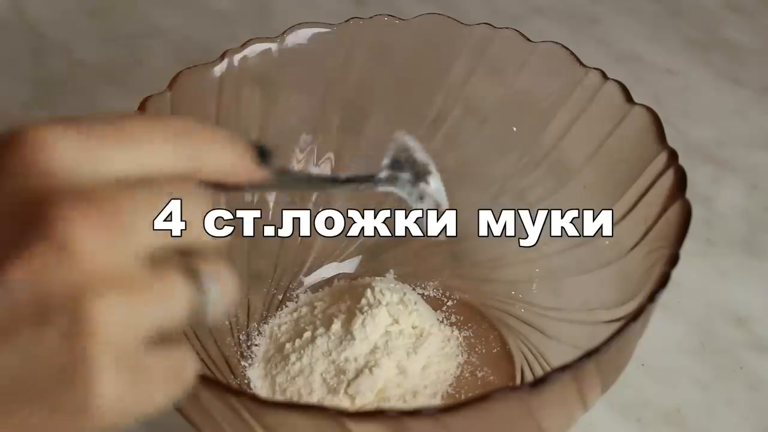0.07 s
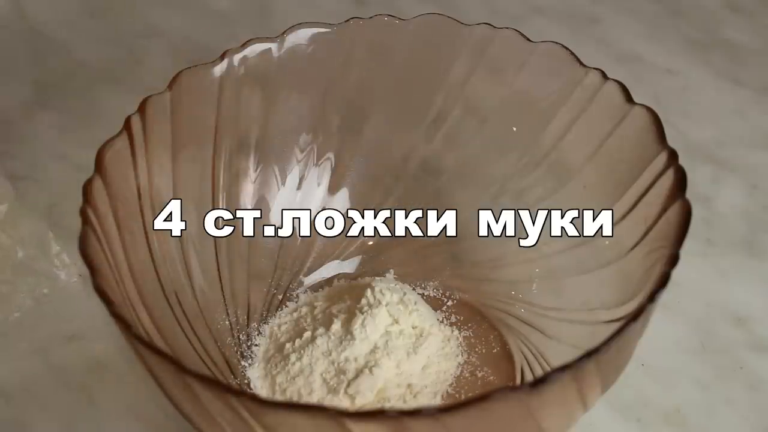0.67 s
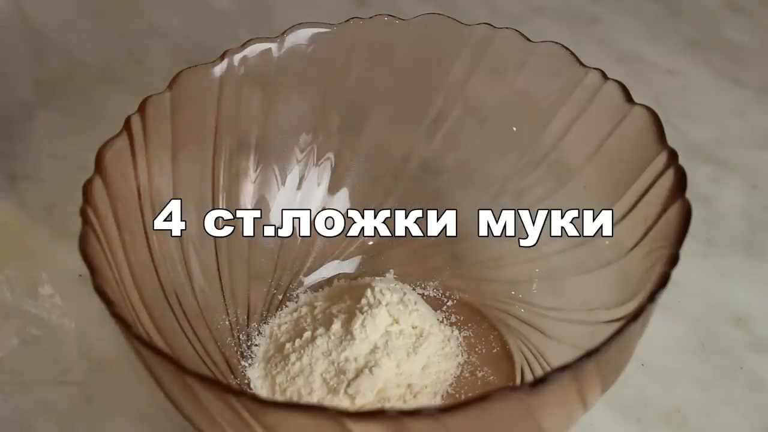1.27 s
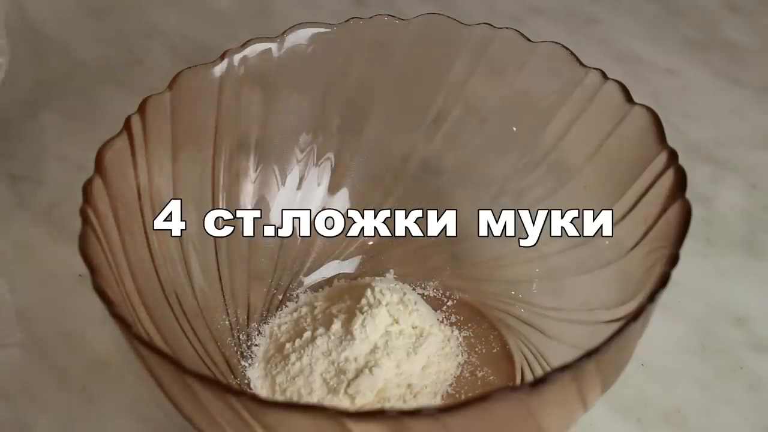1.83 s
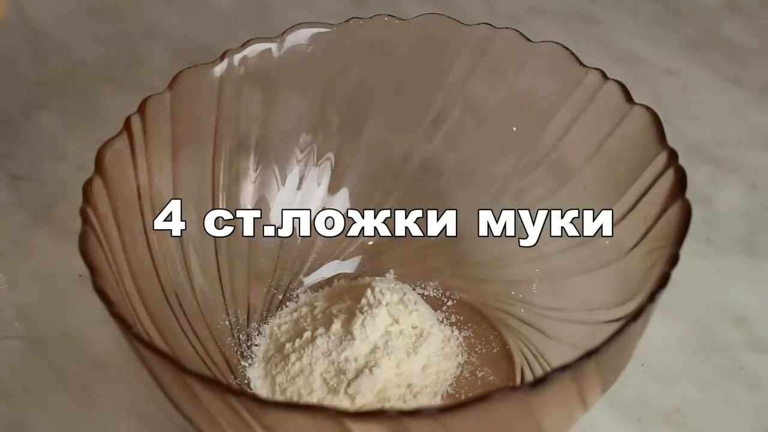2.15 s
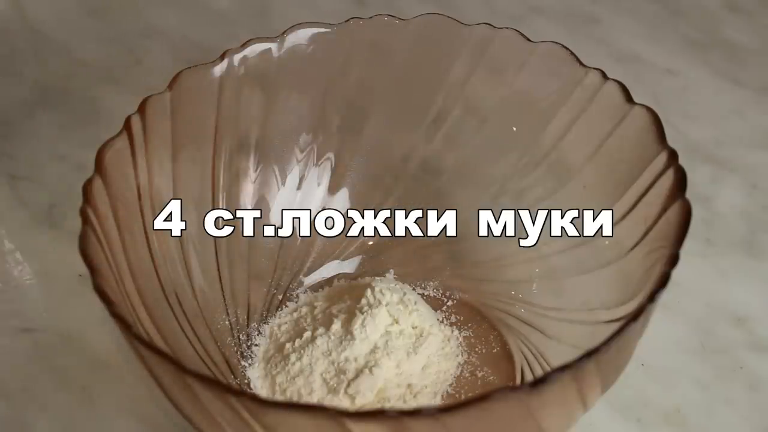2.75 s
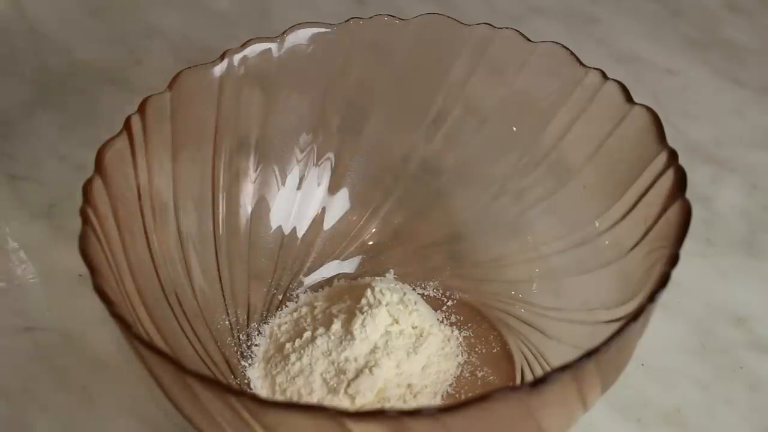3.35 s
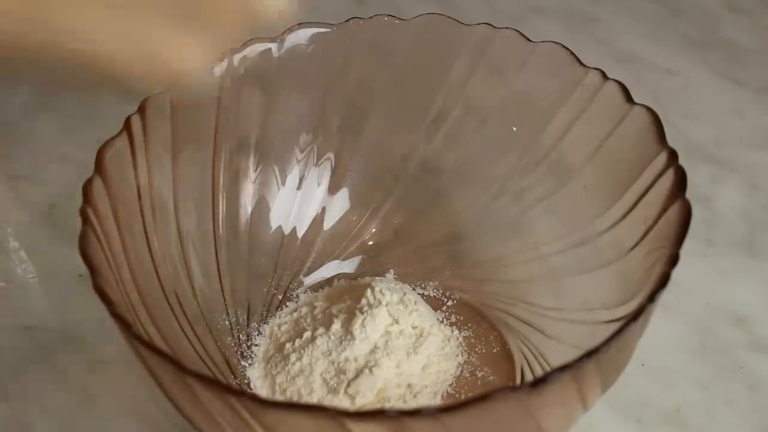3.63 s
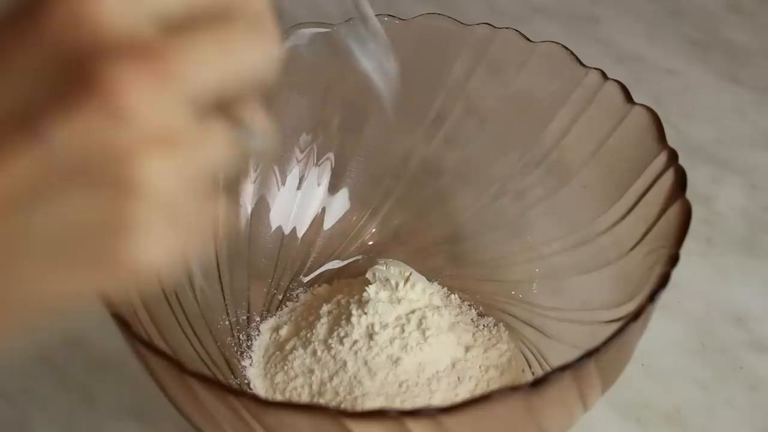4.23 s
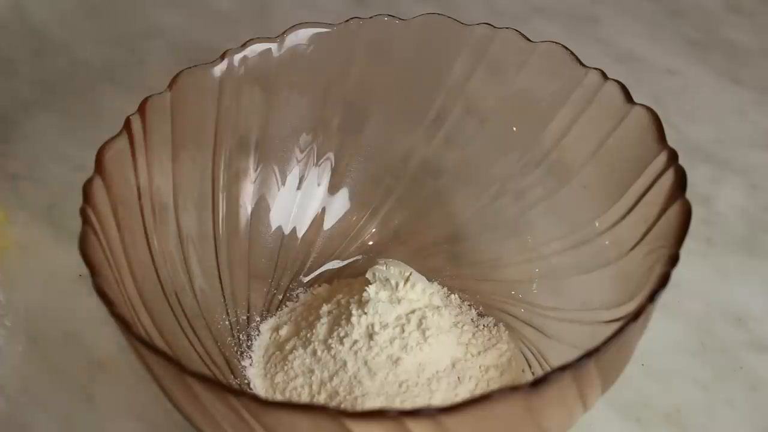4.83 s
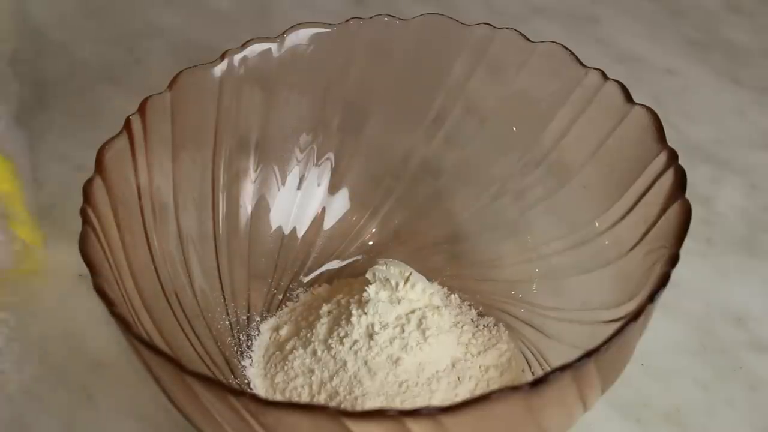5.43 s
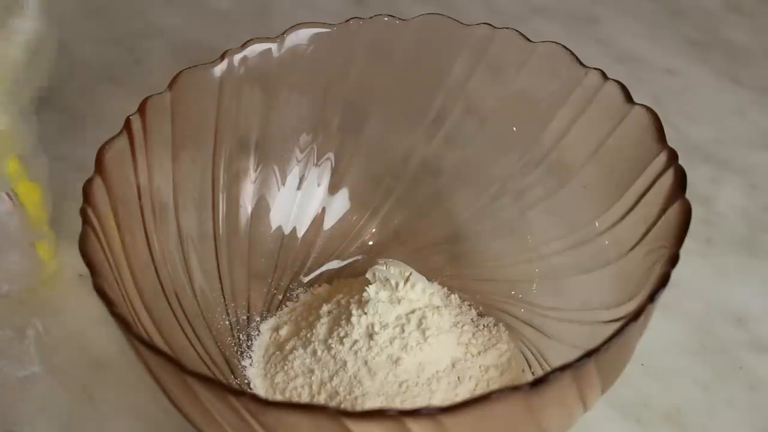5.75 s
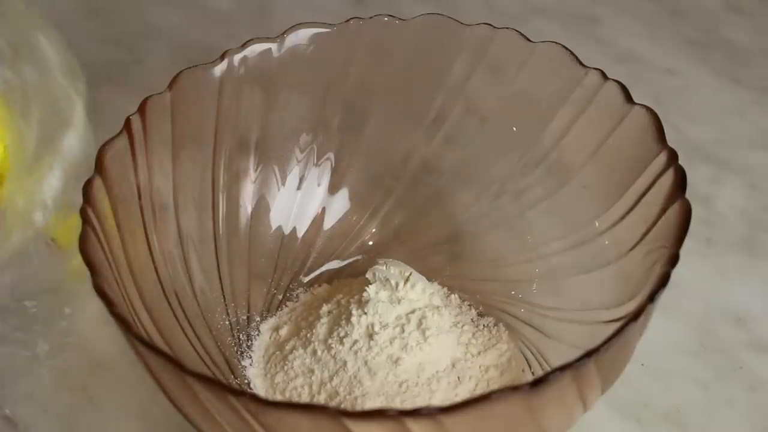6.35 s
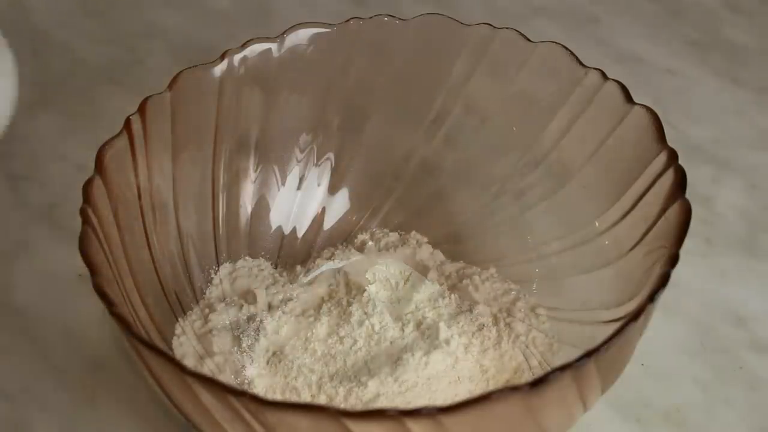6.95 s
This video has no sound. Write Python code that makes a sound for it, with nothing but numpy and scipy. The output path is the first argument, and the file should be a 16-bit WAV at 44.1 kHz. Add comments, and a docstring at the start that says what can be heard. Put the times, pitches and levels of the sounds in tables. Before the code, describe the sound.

A metal spoon rattles faintly, then clacks sharply at about 0.4 seconds. From 0.6 to 2.8 seconds it digs flour out of a thin plastic bag, which crinkles unevenly, with crisp snaps and soft hollow bumps against the counter. A dull knock on the counter comes near 2.4 seconds. The bag then settles with tiny, faint ticks. Just before 4 seconds the spoon clicks once and flour lands in a glass bowl with a barely audible puff. From about 4.5 seconds the bag is gathered up in a long, bright, crackling rustle that grows louder after 5 seconds and lasts until the end, around 7 seconds. Within it come sharp snaps, a thump near 5.5, a short low drag and a slight puff of air on the microphone near 6.2. Everything sounds close, in a small kitchen with short echoes and a faint hum.

```python
"""A spoon rattles lightly and clacks, then digs flour out of a plastic bag on a kitchen counter.
The bag crumples as creases give way, snaps as panels buckle, and bumps; something knocks on the counter.
The spoon clicks and flour drops softly into a glass bowl. Then the thin plastic is gathered up
with a long bright rustle. A small hard room answers, over a faint hum."""
import sys
import numpy as np
from scipy import signal
from scipy.fft import rfft, irfft
from scipy.io import wavfile

SR = 44100
rng = np.random.default_rng(int(sys.argv[2]) if len(sys.argv) > 2 else 0)


def bounce(signal):
    """Save signal as a 16-bit WAV file at the path given by the first command-line argument."""
    frames = np.transpose(np.atleast_2d(signal))
    limited = np.clip(frames, -1, 1)
    pcm = np.round(limited * 32767).astype(np.int16)
    wavfile.write(sys.argv[1], SR, pcm)


N = 307818
TIME = np.arange(N) / SR


def gain_of(db):
    """Decibels to amplitude."""
    return 10 ** (np.asarray(db) / 20)


def unit_rms(x):
    return x / np.sqrt(np.mean(x ** 2) + 1e-20)


def unit_energy(x):
    return x / np.sqrt(np.sum(x ** 2) + 1e-20)


def value_at(points, hz):
    """Interpolates on a log-frequency axis."""
    points_hz, values = np.transpose(points)
    return np.interp(np.log(hz + 1), np.log(points_hz + 1), values)


def add(mix, at_s, sound):
    part = mix[max(round(at_s * SR), 0):][:len(sound)]
    part += sound[:len(part)]


def colour(x, spectrum, size=2048):
    """Minimum-phase filter: attacks stay sharp."""
    gain = gain_of(value_at(spectrum, np.fft.rfftfreq(size, 1 / SR)))
    cepstrum = irfft(np.log(gain))
    cepstrum[1:size // 2] *= 2
    cepstrum[size // 2 + 1:] = 0
    return signal.oaconvolve(x, irfft(np.exp(rfft(cepstrum))))[:len(x)]


def ring(x, hz, width_hz):
    """One damped mode."""
    r = np.exp(-np.pi * width_hz / SR)
    return signal.lfilter([1, 0, -1], [1, -2 * r * np.cos(2 * np.pi * hz / SR), r * r], x)


def swell(at_s, width_s):
    """Gaussian envelope."""
    return np.exp(-((TIME - at_s) / width_s) ** 2)


def drift(rate_hz, size=8192):
    """Smooth random curve of rms 1, rolled off above the rate."""
    step_s = TIME[-1] / (size - 1)
    lowpass = np.exp(-(np.fft.rfftfreq(size, step_s) / rate_hz) ** 2)
    curve = irfft(rfft(rng.standard_normal(size)) * lowpass)
    return np.interp(TIME, np.arange(size) * step_s, unit_rms(curve))


def grains(per_s, spread_db, clump_db, clump_hz):
    """Uneven clicks in clumps, as creases give way; the rare ones are loud."""
    chance = rng.random(N) * SR / per_s
    at = np.flatnonzero(chance < 1)
    rarity = np.minimum(-np.log(chance[at]), 4)
    clicks = np.zeros(N)
    clicks[at] = (-1.) ** at * gain_of(spread_db * rarity + clump_db * drift(clump_hz)[at])
    return clicks


def crackle(spectrum, per_s, spread_db, clump_db, clump_hz):
    """Filtered grains of rms 1."""
    return unit_rms(colour(grains(per_s, spread_db, clump_db, clump_hz), spectrum))


def burst(length_s, rise_share=0.33, size=4096):
    """A run of tiny slips: fast rise, exponential decay, flat spectrum."""
    age = np.arange(size) / SR / length_s
    slips = rng.standard_normal(size) * np.exp(-age) * (1 - np.exp(-age / rise_share))
    flat = irfft(np.exp(1j * np.angle(rfft(slips))))
    return flat * np.exp(-(np.arange(size) / (size / 2)) ** 4)


def impact(spectrum, length_s):
    """Filtered burst of energy 1."""
    return unit_energy(colour(burst(length_s), spectrum))


# room noise spectrum: (frequency [Hz], level [dB])
ROOM_NOISE = [(15, -31), (25, -4.5), (102, -10), (170, -8.5), (205, -10.5), (228, -9), (316, -12),
              (361, -15), (527, -15), (1280, -22.5), (1870, -22), (2390, -23.5), (2730, -24), (3580, -24.5),
              (15800, -26)]
# mains hum: (frequency [Hz], level [dB])
MAINS_HUM = [(101, -69), (202, -66.5)]


def background(noise_db=-54.5, waver_rad=0.46):
    """Steady room noise and a faint wavering mains hum."""
    hum = np.zeros(N)
    for hz, db in MAINS_HUM:
        phase = 2 * np.pi * hz * TIME + waver_rad * drift(rate_hz=2.7)
        hum += gain_of(db) * unit_rms(np.sin(phase))
    return gain_of(noise_db) * unit_rms(colour(rng.standard_normal(N), ROOM_NOISE)) + hum


# spectra of shifting flour and crumpling folds: (frequency [Hz], level [dB])
FLOUR_SHIFT = [(30, -25), (90, -10), (180, -3.5), (250, -3.5), (325, 0.5), (450, -3.5), (590, -2),
               (900, -9), (1500, -7.5), (4000, -54)]
FOLD_CRUMPLE = [(300, -25), (700, -8), (1000, -12.5), (1600, 6), (2700, 2), (4000, -1), (6000, -4),
                (9000, -2), (15000, -71)]


def held_bag(level_db=-58, creak_db=-3):
    """The held bag shifts and creaks faintly before the spoon arrives."""
    shift = crackle(FLOUR_SHIFT, per_s=500, spread_db=1, clump_db=3.3, clump_hz=30)
    creak = crackle(FOLD_CRUMPLE, per_s=900, spread_db=2, clump_db=2, clump_hz=30)
    return gain_of(level_db) * (shift + gain_of(creak_db) * creak) * swell(at_s=0.22, width_s=0.58)


# hard contact spectrum: (frequency [Hz], level [dB])
CONTACT_CLICK = [(200, -4), (1000, -1), (3000, 3.5), (6000, -7), (9000, 6.5), (12000, -3), (16000, -45)]


def strike(blows, modes, contact_db, cutoff_hz, contact_s=0.00057):
    """Blows excite damped modes; returns the direct sound and one merged blow as the room send."""
    grid_hz = np.geomspace(30, 20000, 400)
    power = gain_of(contact_db + value_at(CONTACT_CLICK, grid_hz)) ** 2
    for hz, width_hz, db in modes:
        detuning = (grid_hz ** 2 - hz ** 2) / (grid_hz * width_hz)
        power += gain_of(db) ** 2 / (1 + detuning ** 2)
    power /= 1 + (grid_hz / cutoff_hz) ** 4  # softer contact, less treble
    spectrum = np.transpose([grid_hz, 10 * np.log10(power)])
    direct, send = np.zeros((2, N))
    for at_s, db in blows:
        add(direct, at_s, gain_of(db) * impact(spectrum, contact_s))
    strength = np.linalg.norm([gain_of(db) for _, db in blows])
    add(send, blows[0][0], strength * impact(spectrum, contact_s))
    return direct, send


# spoon modes: (frequency [Hz], width [Hz], level [dB])
SPOON_MODES = [(340, 58, -2), (1460, 200, 3), (1770, 95, 5), (2730, 280, -3), (3490, 270, 1),
               (4600, 1200, -6), (7300, 820, -2), (9000, 600, -3)]
# light touches: (time [s], relative energy [dB])
SPOON_TAPS = [(0.024, -46.5), (0.0737, -41), (0.1153, -39), (0.1333, -41), (0.179, -47), (0.1952, -36),
              (0.2274, -32.5), (0.2447, -38), (0.275, -36.5)]


def spoon_rattle(level_db=15, width_ratio=0.48):
    """Light touches leave the spoon's modes freer to ring than a hard clack does."""
    modes = [(hz, width_hz * width_ratio, db) for hz, width_hz, db in SPOON_MODES]
    direct, _ = strike(SPOON_TAPS, modes, contact_db=-10.5, cutoff_hz=6200, contact_s=0.0021)
    return gain_of(level_db) * direct


# buckling panels: (time [s], relative energy [dB], pitch [Hz], ringing share [0-1], length [s])
BUCKLES = [(0.334, -24, 1450, .9, 0.0035), (0.349, -15, 1480, 0.82, 0.0062), (0.805, -17, 1610, 0.7, .004),
           (0.839, -1.5, 1580, 0.09, 0.0041), (0.929, -6.5, 1550, 0.4, 0.0052),
           (0.958, -3.5, 1460, .85, 0.002), (0.972, -3.5, 2450, 0.5, 0.0027),
           (1.001, -7.5, 2300, 0.56, .005), (1.037, -2, 1995, 0.4, .0035), (1.084, -1, 940, 0.32, 0.0045),
           (1.395, -12.5, 1790, 0.64, 0.0025), (1.443, -9, 1750, 0.55, 0.0042),
           (1.473, -4.5, 940, 0.33, 0.013), (1.495, -4, 1620, 0.98, 0.0033), (1.876, -3, 2300, 0.64, .004),
           (1.892, -6.5, 1710, 1, 0.0033), (1.94, -10.5, 1080, 0.8, 0.0063), (2.201, -12.5, 1440, .9, .004),
           (2.256, 0.5, 2220, 0.28, .003), (4.587, -22, 1580, 0.9, 0.0035), (4.599, -12.5, 1390, 1, 0.0031),
           (4.772, -11.5, 1070, 0.4, 0.0042), (5.064, -18.5, 1460, .5, 0.0034),
           (5.169, -3, 1770, 0.8, 0.0095), (5.224, -6, 1560, 0.7, 0.0083), (5.243, -1.5, 2470, 0.5, 0.01),
           (5.466, -9, 1800, .1, 0.004), (5.826, -9, 1880, 0.64, .003), (5.904, 2, 2830, 0.27, .003),
           (6.167, -4, 950, 1, .003)]
# spectra of a snap's parts: (frequency [Hz], level [dB])
SNAP_CRACK = [(2000, -39), (4500, -7), (8000, 13.5), (10500, 10), (12500, 8), (15500, -14)]
SNAP_BODY = [(40, -23), (150, -1.5), (300, 0), (700, 1.5), (1300, 4), (2400, 2.5), (3800, 2.5),
             (5500, -6.5), (9000, -11.5), (15000, -42)]
SNAP_THUD = [(50, -29), (150, -3), (250, 0.5), (325, -2.5), (450, -3.5), (580, -8.5), (800, -4),
             (2000, -71)]


def bag_snaps(level_db=1.34, crack_db=-6, thud_db=-15, panel_q=9.1):
    """A panel buckles: it cracks, rings and thuds against the flour; a clean ring cracks less."""
    out = np.zeros(N)
    for at_s, db, hz, ring_share, length_s in BUCKLES:
        # harder snaps put a smaller share into crack and thud
        crack = gain_of(crack_db - 0.25 * db) * impact(SNAP_CRACK, length_s)
        body = impact(SNAP_BODY, length_s)
        panel = unit_energy(ring(burst(length_s), hz, hz / panel_q))
        thud = gain_of(thud_db - 0.55 * db) * impact(SNAP_THUD, length_s)
        snap = np.sqrt(1 - ring_share) * (body + crack) + np.sqrt(ring_share) * panel + thud
        add(out, at_s, gain_of(level_db + db) * snap)
    return out


# hard blows: (time [s], energy [dB])
SPOON_BLOWS = [(.4106, 6.5), (.4113, 4.5), (.4127, 3.5), (.415, -4)]


def spoon_clack():
    """The spoon chatters against something hard; returns direct sound and room send."""
    return strike(SPOON_BLOWS, SPOON_MODES, contact_db=-10.5, cutoff_hz=15000)


# bag movements: (time [s], film level [dB], fold level [dB])
SPOON_IN = [(0.58, -48.5, -64), (0.788, -48, -45.5), (0.85, -31, -36.5), (0.93, -44, -44),
            (0.99, -39.5, -47), (1.048, -48, -36.5), (1.178, -41, -35.5), (1.27, -47, -46)]
SPOON_OUT = [(1.27, -42, -46.5), (1.452, -44.5, -44), (1.746, -40.5, -50), (1.864, -37.5, -39),
             (2.078, -43, -44.5), (2.36, -51, -45), (2.636, -48.5, -57.5), (2.794, -59, -57),
             (2.95, -74, -74)]
HAND_GRIP = [(4.4, -65, -68), (4.442, -60.5, -75), (4.644, -40.5, -45.5), (4.756, -46, -50.5),
             (4.866, -34.5, -37), (5.012, -55, -55), (5.12, -52, -55)]
HAND_GATHER = [(5.12, -52, -54), (5.254, -32.5, -33), (5.322, -39.5, -46.5), (5.502, -31.5, -40.5),
               (5.528, -36.5, -38.5), (5.7, -29.5, -39), (5.968, -30, -35.5), (6.004, -33, -47),
               (6.14, -26, -34), (6.352, -36.5, -47.5), (6.362, -30.5, -40), (6.776, -37, -47.5),
               (6.814, -33, -44.5), (6.906, -39, -50.5), (6.922, -31, -50), (6.98, -41.5, -52)]


def handling(fade_db_per_s=35):
    """Film and fold envelopes for scooping and gathering, faded at both ends."""
    out = np.zeros((2, N))
    for bout in (np.vstack([SPOON_IN, SPOON_OUT]), np.vstack([HAND_GRIP, HAND_GATHER])):
        times_s, *curves_db = bout.T
        fade_db = fade_db_per_s * abs(TIME - np.clip(TIME, times_s[0], times_s[-1]))
        out += [gain_of(np.interp(TIME, times_s, db) - fade_db) for db in curves_db]
    return out


# sliding flaps: (time [s], rise [s], peak level [dB])
FLAP_SLIDES = [(0.645, 0.019, -49.5), (2.075, 0.037, -37), (2.2, 0.031, -38.5), (2.62, 0.06, -42.5),
               (4.48, 0.045, -63), (5.34, 0.029, -39), (5.68, 0.035, -32)]


def flap_swishes(sharpness=2.2):
    """Envelope of loose flaps sliding over the bag: fast rise, slower decay."""
    out = np.zeros(N)
    for at_s, rise_s, db in FLAP_SLIDES:
        age = np.maximum(TIME - at_s, 0) / rise_s
        out += gain_of(db) * (age * np.exp(1 - age)) ** sharpness
    return out


# thin film spectrum: (frequency [Hz], level [dB])
FILM_FIZZ = [(1000, -31.5), (3000, -8.5), (5500, -10), (7000, -7), (8500, -3), (11000, -0.5), (12200, -4.5),
             (13500, -11), (15800, -19.5)]


def bag_rustle(shift_db=-44, panels_db=-8, swish_folds_db=-7, firm_push_db=-36, shift_db_per_db=0.59):
    """The film fizzes, folds crumple and ring small panels, and the flour shifts with the folds."""
    shift = crackle(FLOUR_SHIFT, per_s=1200, spread_db=1.7, clump_db=2.5, clump_hz=27)
    panels = np.zeros(N)
    for hz in np.geomspace(850, 3300, 14):
        clicks = grains(per_s=70, spread_db=2.4, clump_db=2.8, clump_hz=21)
        panels += unit_rms(ring(clicks, hz, width_hz=160)) / np.sqrt(hz)
    creases = crackle(FOLD_CRUMPLE, per_s=2600, spread_db=2.8, clump_db=1.8, clump_hz=55)
    folds = unit_rms(creases + gain_of(panels_db) * unit_rms(panels))
    film = crackle(FILM_FIZZ, per_s=7000, spread_db=2.3, clump_db=1.7, clump_hz=70)
    film_gain, fold_gain = handling()
    swish = flap_swishes()
    film_gain = np.hypot(film_gain, swish)
    fold_gain = np.hypot(fold_gain, gain_of(swish_folds_db) * swish)
    push = (fold_gain / gain_of(firm_push_db)) ** shift_db_per_db
    return film_gain * film + fold_gain * folds + gain_of(shift_db) * push * shift


# bag against counter: (time [s], energy [dB])
BAG_BUMPS = [(0.668, -30), (0.841, -6), (0.878, -1.5), (1.942, -8.5), (2.257, -9.5), (2.358, -7),
             (4.601, -15.5), (4.772, -12.5), (4.864, -12), (4.925, -10.5), (5.467, 1), (6.505, -11.5),
             (6.673, -19)]
# hollow modes: (frequency [Hz], width [Hz], level [dB])
HOLLOW_MODES = [(200, 80, -13), (340, 55, 1), (446, 60, 0), (562, 60, -1), (719, 90, -7), (934, 100, -6)]


def bag_bumps(push_s=0.0024, slap_db=-12, cutoff_at_0db_hz=3000, hardening=1.8):
    """Each bump wakes hollow modes and slaps the film; heavier ones are brighter."""
    out = np.zeros(N)
    for at_s, db in BAG_BUMPS:
        push = burst(push_s)
        thump = sum(gain_of(mode_db) * unit_energy(ring(push, hz, width_hz))
                    for hz, width_hz, mode_db in HOLLOW_MODES)
        slap = gain_of(slap_db) * unit_energy(colour(push, SNAP_BODY))
        cutoff_hz = cutoff_at_0db_hz * gain_of(db) ** hardening
        pole = np.exp(-2 * np.pi * cutoff_hz / SR)
        cushioned = signal.lfilter([1], [1, -pole], unit_energy(thump) + slap)
        add(out, at_s, gain_of(db) * unit_energy(cushioned))
    return out


# blows on the counter: (time [s], energy [dB])
COUNTER_BLOWS = [(2.4466, 1.5), (2.4492, 3.5)]
# counter modes: (frequency [Hz], width [Hz], level [dB])
COUNTER_MODES = [(565, 170, -5), (1000, 190, -1), (1370, 210, 2), (1900, 190, -5.5), (2900, 340, -10),
                 (3540, 390, -9)]


def counter_knock():
    """A dull knock rings the counter; returns direct sound and room send."""
    return strike(COUNTER_BLOWS, COUNTER_MODES, contact_db=-17, cutoff_hz=4500)


def bag_settling(level_db=-65):
    """Left alone, the film creeps back with faint crackles."""
    creep = crackle(FILM_FIZZ, per_s=230, spread_db=3, clump_db=1.3, clump_hz=14)
    return gain_of(level_db) * creep * swell(at_s=3.4, width_s=0.49)


# single creases: (time [s], energy [dB])
CREASE_RELEASES = [(3.169, -25), (3.525, -26.5), (3.673, -25.5), (3.771, -31), (3.806, -31)]


def crease_ticks(length_s=0.0013):
    """Creases of the resting bag let go with tiny snaps."""
    out = np.zeros(N)
    for at_s, db in CREASE_RELEASES:
        add(out, at_s, gain_of(db) * impact(FILM_FIZZ, length_s))
    return out


# spoon click spectrum: (frequency [Hz], level [dB])
TIP_CLICK = [(200, -21), (900, -12), (1700, -7), (2700, 3), (5500, -6), (8000, 0), (10500, 5), (13000, -11),
             (16000, -22)]


def spoon_tip(at_s=3.9562, energy_db=-10):
    """The spoon clicks once as it is tipped over the bowl."""
    out = np.zeros(N)
    click = unit_energy(colour(signal.unit_impulse(1024), TIP_CLICK))
    add(out, at_s, gain_of(energy_db) * click)
    return out


def flour_drop(level_db=-59):
    """The spoonful lands with a soft puff in the hollow of the bowl."""
    hollow = unit_rms(ring(rng.standard_normal(N), hz=700, width_hz=220))
    return gain_of(level_db) * hollow * swell(at_s=4.04, width_s=0.045)


def bag_drag(level_db=-41):
    """The bag drags over the counter with a low rub."""
    slips = grains(per_s=1500, spread_db=1.7, clump_db=2, clump_hz=30)
    rub = unit_rms(ring(slips, hz=590, width_hz=260))
    return gain_of(level_db) * rub * swell(at_s=5.64, width_s=0.08)


def air_puff(level_db=-49):
    """Air pushed out of the bag brushes the microphone."""
    return gain_of(level_db) * drift(rate_hz=90) * swell(at_s=6.19, width_s=0.07)


# kitchen decay: (frequency [Hz], T60 [s])
KITCHEN_T60 = [(200, 0.31), (600, 0.44), (1500, 0.28), (4000, 0.32), (9000, 0.15), (15000, 0.69)]


def reflections(gap_s=0.0017, per_s=5000, size=24000):
    """Dense echoes from tiles and cupboards, each band dying at its own rate."""
    echoes = rng.choice([-1., 1.], size) * (rng.random(size) < per_s / SR)
    echoes *= np.arange(size) > gap_s * SR
    hz, age_s, bands = signal.stft(echoes, SR, nperseg=256)
    decay = gain_of(-60 * age_s / value_at(KITCHEN_T60, hz)[:, None])
    return unit_energy(signal.istft(bands * decay, SR, nperseg=256)[1])


def kitchen(send, patterns=5, patterns_per_s=3.1):
    """Kitchen reverb; echo patterns crossfade at a steady rate to keep the tail smooth."""
    out = np.zeros(N)
    for k in range(patterns):
        offset = abs((patterns_per_s * TIME - k + patterns / 2) % patterns - patterns / 2)
        weight = np.cos(np.pi / 2 * np.minimum(offset, 1))
        out += signal.oaconvolve(send * weight, reflections())[:N]
    return out


def scene(hits_send_db=0.5, film_send_db=-8, clack_send_db=1, knock_send_db=-1, near_send_db=-7,
          side_db=-38):
    """Direct sound plus kitchen echoes, in two almost identical channels."""
    hits = bag_snaps() + bag_bumps() + spoon_rattle()
    film = held_bag() + bag_rustle() + bag_settling() + bag_drag()
    clack, clack_send = spoon_clack()
    knock, knock_send = counter_knock()
    near = crease_ticks() + spoon_tip() + flour_drop()
    direct = hits + film + clack + knock + near
    send = gain_of(hits_send_db) * hits + gain_of(film_send_db) * film + gain_of(near_send_db) * near
    send += gain_of(clack_send_db) * clack_send + gain_of(knock_send_db) * knock_send
    mid = direct + kitchen(send) + air_puff() + background()
    side = gain_of(side_db) * signal.oaconvolve(direct, reflections())[:N]
    return np.array([mid + side, mid - side])


# hiss spectrum: (frequency [Hz], level [dB])
CHANNEL_HISS = [(25, 17), (100, 14), (300, 12), (1000, 5), (5000, 1), (12000, 6), (16000, 4)]


def record(dry, hiss_db=-69, ceiling=0.85, cutoff_hz=15950):
    """Faint independent hiss per channel, peak clipping, then a low-pass."""
    hiss = np.array([unit_rms(colour(noise, CHANNEL_HISS)) for noise in rng.standard_normal(dry.shape)])
    clipped = np.clip(dry + gain_of(hiss_db) * hiss, -ceiling, ceiling)
    lowpass = signal.firwin(511, cutoff_hz, window=("kaiser", 9), fs=SR)
    return signal.oaconvolve(clipped, lowpass[None], "same")


dry = scene()
out = record(dry)
bounce(out)
```